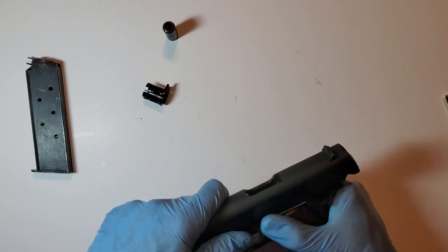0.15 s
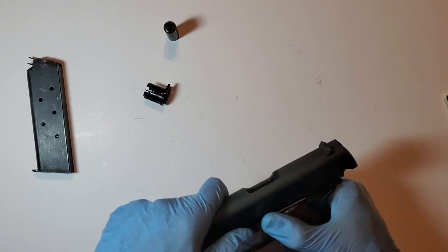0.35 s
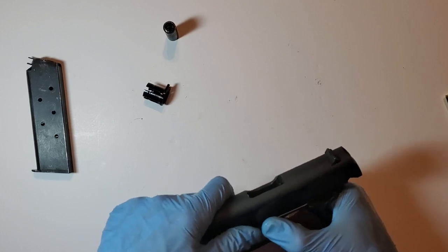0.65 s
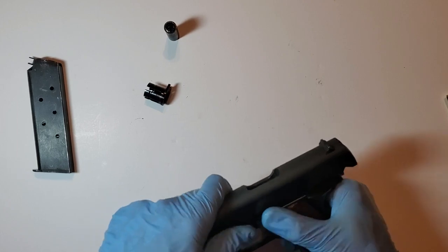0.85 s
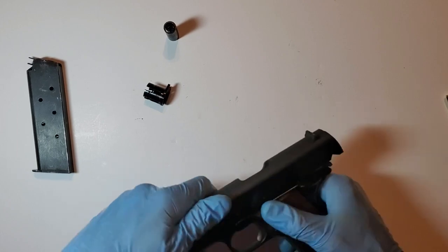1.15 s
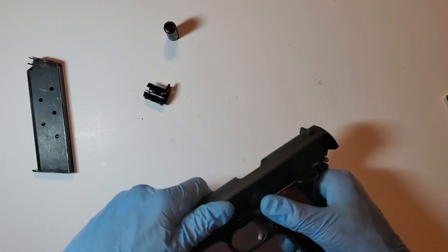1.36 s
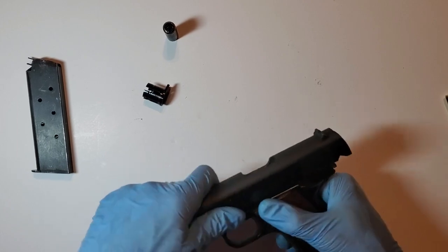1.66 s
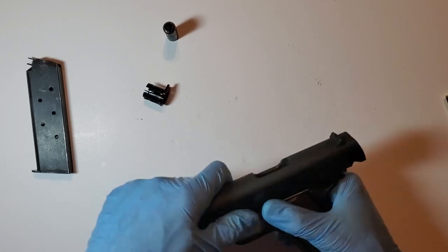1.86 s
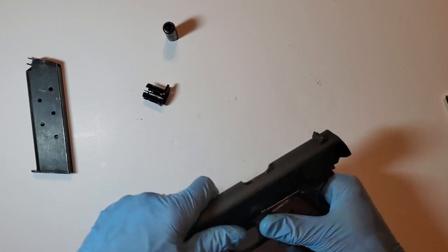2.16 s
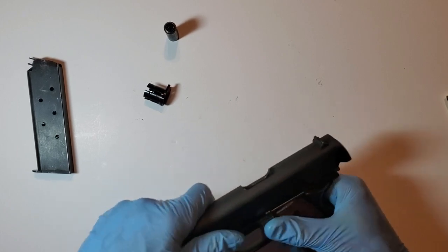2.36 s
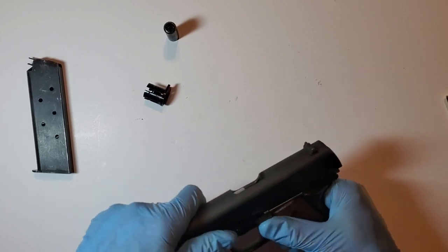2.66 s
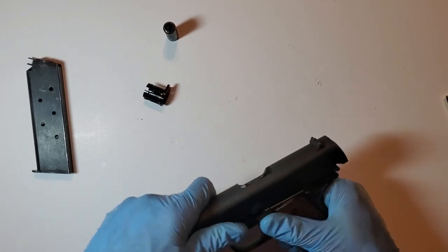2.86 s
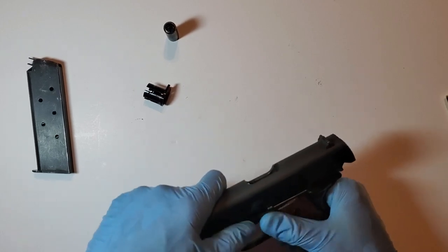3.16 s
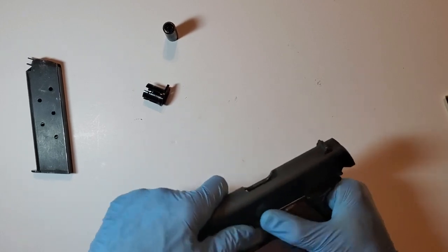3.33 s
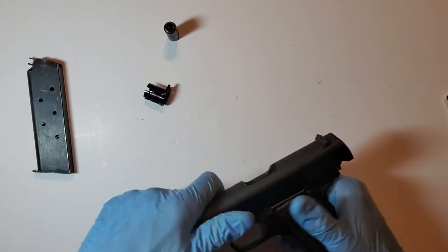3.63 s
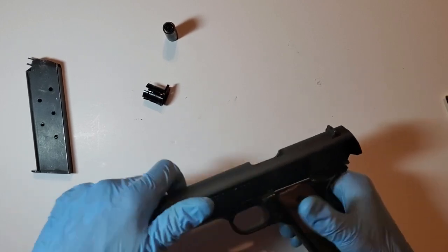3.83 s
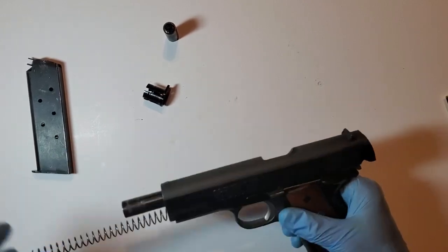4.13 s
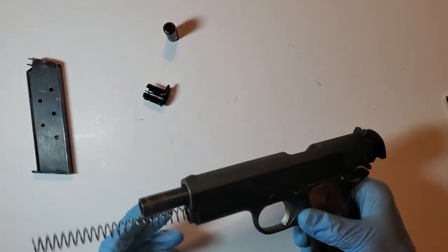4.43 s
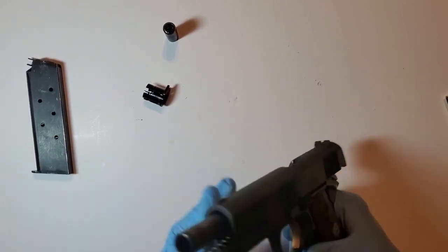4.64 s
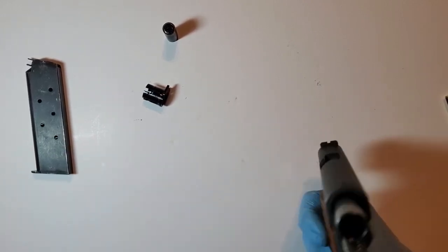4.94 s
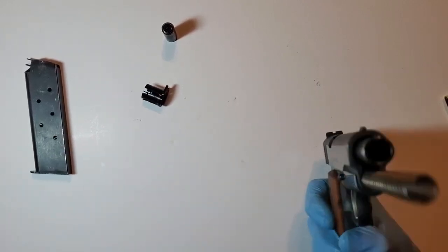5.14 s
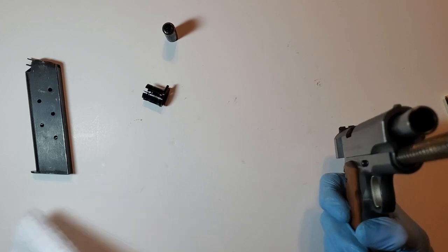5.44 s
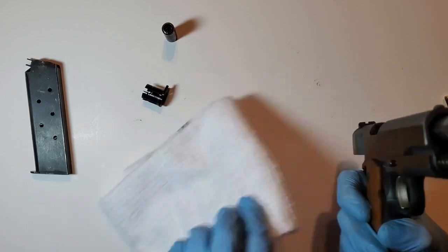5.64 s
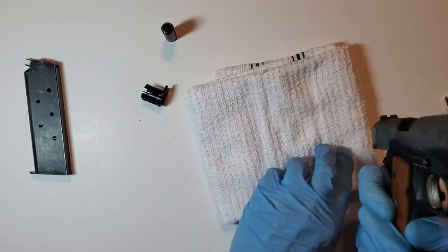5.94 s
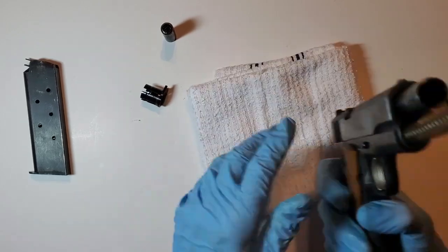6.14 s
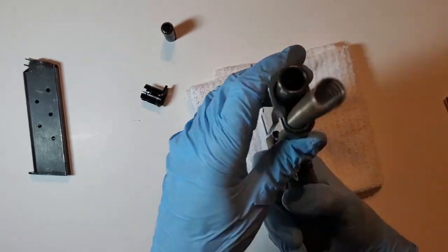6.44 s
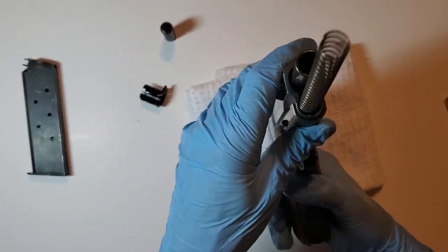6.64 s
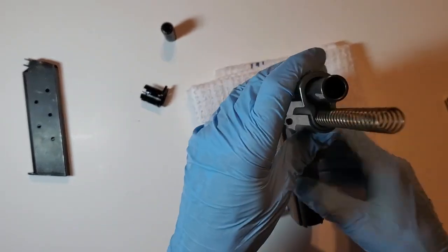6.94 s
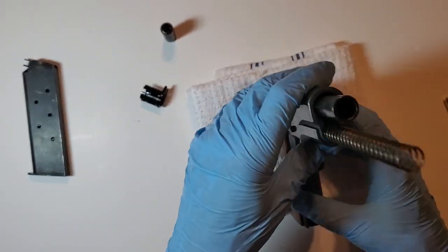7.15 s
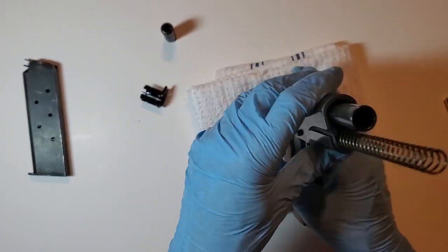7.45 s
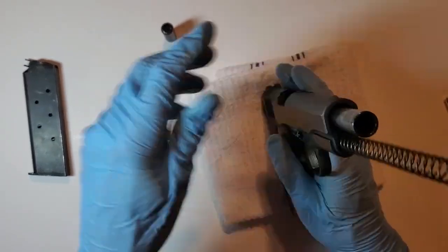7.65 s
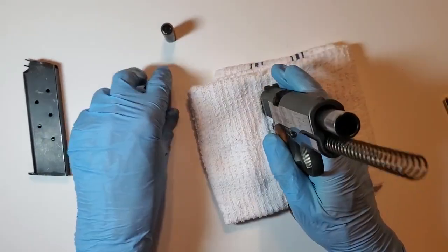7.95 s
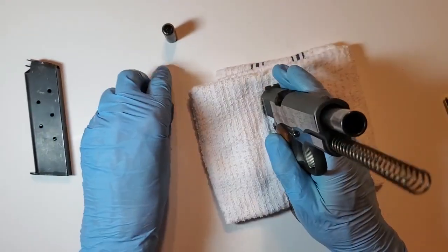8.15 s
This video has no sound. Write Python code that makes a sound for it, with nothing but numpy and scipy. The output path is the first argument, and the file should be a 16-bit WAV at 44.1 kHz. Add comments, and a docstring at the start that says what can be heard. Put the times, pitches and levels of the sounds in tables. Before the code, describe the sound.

Gloved hands take apart a steel pistol above a table, heard close with short room echoes. Small dry ticks and gritty scrapes build to a loud metallic snap with rebounds, followed by a spring's fast jittery rattle and a double knock. Then it gets quiet: towel and glove brushing, one dull pat, a few crisp clicks, tiny high clinks, over soft room noise and hum.

```python
"""In a small, lively room, gloved hands take a steel pistol apart above a table.
The slide ticks, rubs and knocks, a part snaps free and the loose recoil spring rattles along the barrel.
A towel is drawn over the table and patted, a catch clicks and a small part is picked up.
Steel contacts are short noise cracks plus ringing tones; rubbing and cloth are rough, shaped noise.
Mains hum, a low rumble and room noise lie below."""
import sys
import numpy as np
from scipy import signal
from scipy.fft import rfft, irfft
from scipy.io import wavfile

SR = 44100
rng = np.random.default_rng(int(sys.argv[2]) if len(sys.argv) > 2 else 0)


def generate_wav(signal):
    """Clip the signal to [-1, 1] and save it as 16-bit WAV at the path in sys.argv[1]."""
    frames = np.transpose(np.atleast_2d(signal))
    scaled = np.clip(frames, -1, 1) * 32767
    pcm = np.round(scaled).astype(np.int16)
    wavfile.write(sys.argv[1], SR, pcm)


N = 365588
TIME = np.arange(N) / SR

# In the event tables, levels are relative: each source also has a gain of its own.
# slide ticks against the frame: (time [s], level [dB], brightness [dB per octave], crack t60 [s])
SLIDE_TICKS = [(0.0735, -49.5, -5.5, .012), (0.0915, -50, -10, 0.019), (0.6085, -47, 1.5, 0.017),
               (0.6725, -56.5, -1.5, .03), (0.7095, -58, -4, .02), (1.0065, -46, 4, .017),
               (1.0435, -36.5, 6.5, 0.032), (1.0635, -42.5, -2, .04), (1.0955, -39.5, -4, 0.041),
               (1.1265, -31.5, 2.5, .024), (1.3745, -51, 0.5, 0.015), (1.6885, -30, -0.5, 0.02),
               (1.6995, -35, 0, 0.037), (1.7085, -35, 0, 0.031), (1.8045, -38.5, -3.5, 0.012),
               (1.8215, -35.5, -2, .044), (2.0105, -55, -3, 0.018), (2.0275, -46, -4, 0.014),
               (2.0795, -41.5, 2, 0.053), (2.1155, -46.5, .5, .023), (2.1775, -49, -3, .035),
               (2.1885, -50, -4, 0.038), (2.2355, -39, 3, 0.047), (2.5315, -43, -3, 0.012),
               (2.7535, -42, 2, 0.036), (2.7765, -31, 2.5, .032), (2.7905, -24.5, 4.5, 0.011),
               (2.8395, -30, 3, 0.048), (2.8475, -33.5, 1.5, .03), (2.8735, -39, -6, .025),
               (3.0745, -30, 4.5, 0.047), (3.6743, -49, 1.5, 0.13), (3.7205, -47.5, -2.5, 0.039),
               (3.8525, -30.5, 0.9, 0.03), (3.9615, -49, -3.5, .044), (4.2465, -42, 2.5, 0.044),
               (4.2505, -41.5, 9, .02), (4.3235, -30, 2, .02)]
# the whole slide knocks against its stop: (time [s], level [dB], brightness [dB per octave], crack t60 [s])
STOP_KNOCKS = [(3.0805, -26, -1, .012), (4.7325, -25, 0, 0.019), (4.739, -26.5, 1.5, 0.014)]
# light taps of the loose barrel: (time [s], level [dB], brightness [dB per octave])
BARREL_TAPS = [(0.4555, -39.5, 2), (0.4665, -47, -4), (0.9125, -54.5, -5.5), (0.9695, -43.5, -3),
               (3.292, -42, 4), (4.0155, -40.5, -3), (4.0275, -51, -17), (4.8265, -47.5, -5),
               (4.9195, -45.5, 3), (5.0815, -52.5, 1), (6.3455, -54.5, -3), (6.4725, -54, -3)]
# a part snaps free under spring load and rebounds:
# (time [s], level [dB], brightness [dB per octave], crack t60 [s])
SNAP_HITS = [(3.3595, -16.5, 0, 0.018), (3.3695, -25.5, 2.5, .044), (3.3825, -20, 0.5, 0.039),
             (3.3865, -25, -1.5, .044)]
# spring coils rattle against their guide, later sway: (time [s], level [dB], brightness [dB per octave])
SPRING_TICKS = [(4.3935, -31.5, -2), (4.4015, -35, 7), (4.4115, -38, -2), (4.4345, -32, -3),
                (4.4515, -33.5, 6), (4.4685, -35.5, -1), (4.5315, -37, 2), (4.5415, -27, 1.5),
                (4.5505, -27, 0.5), (4.6015, -36, 1), (4.6175, -29.5, -1.5), (4.6825, -41.5, -3.5),
                (4.8395, -41.5, -1), (6.3375, -48.5, 0), (6.4085, -54, 2), (6.4265, -50, 1),
                (6.9695, -53, 3), (7.0635, -56, -0.5), (7.2155, -63.5, -1), (7.2975, -63, -1),
                (7.8875, -54, 1), (7.9765, -59, -4), (8.1355, -57.5, -5)]
# the catch on the gripped frame: (time [s], level [dB], brightness [dB per octave], crack t60 [s])
CATCH_CLICKS = [(6.2315, -36, 1.5, 0.053), (6.5513, -46, -4.5, 0.019), (6.6235, -51.5, 0, 0.051),
                (6.8365, -30, 0, 0.013)]
# a small loose part is picked up: (time [s], level [dB], brightness [dB per octave])
CLINKS = [(7.6295, -53, -5), (7.6515, -51, 3), (7.6985, -47, 0), (7.7405, -39, 0.5), (7.8365, -48.5, 0)]

# edges of the four bands that share a contact's energy: (edge [Hz])
CONTACT_BANDS = [800, 2400, 4500, 9000, 17000]
# how each part divides a contact among those bands, low to high: (share [dB])
SLIDE_SHARES = [-13, -4, -4.5, -10.5]
STOP_SHARES = [-11, -4.5, -4.5, -7.5]
BARREL_SHARES = [-10.5, -2.5, -7.5, -15]
SNAP_SHARES = [-16.5, -3, -8, -7]
SPRING_SHARES = [-15.5, -10, -2, -5.5]
CATCH_SHARES = [-11, -3, -4, -11.5]
CLINK_SHARES = [-12.5, -3.5, -3, -12]

# broad, hand-damped resonances of each part: (frequency [Hz], width [Hz], boost [dB])
SLIDE_BODY = [(1104, 580, 7), (2110, 450, 5), (3520, 500, 6.5), (4860, 83, 2), (6610, 820, 14),
              (7230, 160, 12.5), (8140, 180, 9.5), (10500, 700, 6), (10800, 290, 10), (14900, 1200, 2)]
STOP_BODY = [(1366, 300, 12), (1970, 330, 16), (2670, 360, 5.2), (3470, 350, 5.2), (7350, 1800, 14),
             (14950, 900, 4)]
BARREL_BODY = [(3180, 200, 9), (3380, 190, 18.5), (7360, 200, 7.4), (8000, 120, 9.3), (8350, 230, 8.3),
               (11230, 300, 4.4), (15000, 900, 4)]
SNAP_BODY = [(1895, 430, 6.5), (2353, 200, 3.3), (3140, 300, 4), (3480, 230, 15), (4000, 240, 4.1),
             (5150, 370, 4.7), (6360, 870, 4.9), (11650, 1200, 8.7), (15250, 570, 8.4)]
SPRING_BODY = [(2240, 580, 6.1), (3500, 300, 12), (4340, 230, 5.5), (6640, 1000, 7.7), (7950, 91, 19.8),
               (8400, 240, 8.3), (10400, 530, 9), (11410, 130, 20), (11900, 190, 4.1)]
CATCH_BODY = [(1240, 220, 8.2), (2290, 360, 7.7), (3850, 66, 10), (5730, 470, 10), (7140, 690, 11),
              (12700, 1600, 6)]
CLINK_BODY = [(2110, 250, 9.8), (3400, 340, 8.4), (4780, 200, 11.3), (7400, 430, 5.9), (8200, 160, 5.8),
              (10850, 150, 9.2), (11760, 130, 16)]

# the tones of each part that ring on: (frequency [Hz], relative level [dB], t60 [s])
SLIDE_MODES = [(2675, -14.5, 0.048), (4000, -26.5, .12), (7000, -18, .14), (11340, -31, .16)]
STOP_MODES = [(1437, -6, .13), (2000, -8, 0.093), (2520, -22, 0.1), (3500, -14, .22), (3750, -21.5, .22)]
BARREL_MODES = [(3630, -11, .1), (3410, -10, 0.15), (3560, -14, .13), (8000, -19, .12), (8550, -19.5, .1)]
SNAP_MODES = [(2945, -22.5, .27), (3123, -22, .3), (3220, -13.5, 0.19), (3420, -12.5, 0.32),
              (3510, -5, .25), (3380, -14, 0.18), (3520, -11, 0.16), (3730, -20, 0.33), (3894, -21.5, 0.23),
              (4600, -20.5, .17), (4393, -19, .17), (5250, -18, 0.17), (11400, -26, .16),
              (13070, -19.5, .15)]
SPRING_MODES = [(2280, -11, .2), (3461, -29, 0.18), (4600, -30, 0.25), (7600, -13.5, 0.37),
                (8500, -31, 0.18), (11333, -15, 0.33), (11200, -19, .18), (12030, -30, .25)]
CATCH_MODES = [(1236, 0.5, 0.1), (2395, -15, .09), (3840, -14, 0.083), (5880, -21, 0.058)]
CLINK_MODES = [(4900, -20, 0.13), (7540, -19, .12), (8450, -23, 0.15), (11600, -3, 0.19)]

# steel slides on steel: (start [s], length [s], level [dB], treble tilt [dB per octave])
STROKES = [(0.432, 0.18, -58.5, 0), (0.98, 0.13, -51, 0), (1.646, 0.096, -40, -3.5), (1.754, .1, -54, -7),
           (1.991, 0.17, -54.5, -6), (2.478, 0.12, -43.5, -7), (2.743, 0.13, -41, -0.5),
           (3.054, .05, -50, -4.5), (3.355, 0.12, -39, 4), (3.719, 0.25, -52.5, 0), (3.934, 0.29, -57, -1),
           (4.306, 0.056, -46, 6), (4.373, 0.12, -48.5, -1), (4.52, .15, -48, 2),
           (4.655, 0.18, -43.5, -2.5), (6.401, 0.12, -60, -7)]
# spectrum of steel sliding: (frequency [Hz], density [dB per Hz])
STROKE_COLOUR = [(400, -21.5), (1000, -7.5), (2000, -6), (3500, 4.5), (5000, -3), (7000, 0), (9500, -5),
                 (11500, -3), (13000, -8), (16000, -13.5)]
# gloves and towel brush past: (start [s], length [s], soft rub level [dB], fine hiss level [dB])
BRUSHES = [(0.203, 0.25, -66, -74), (5.02, 0.29, -63, -66.5), (5.283, 0.37, -65.5, -62.5),
           (5.55, 0.38, -69, -69), (5.735, 0.23, -72, -63.5), (5.82, 0.49, -63, -68),
           (6.206, 0.18, -58, -58.5), (6.365, 0.3, -63.5, -66), (6.58, 0.6, -71, -71),
           (6.916, .19, -65, -64), (7.272, .15, -71, -79), (7.469, 0.52, -66, -68), (7.848, 0.31, -70, -76)]
# spectrum of the soft cloth rub: (frequency [Hz], density [dB per Hz])
RUB_COLOUR = [(600, -6), (1500, -15), (2800, -0.5), (4000, -1.5), (6800, 1), (8500, -3), (11000, -17)]
# spectrum of the fine cloth hiss: (frequency [Hz], density [dB per Hz])
HISS_COLOUR = [(6500, -30), (9500, -3), (13000, 3), (16000, 0.5)]

# how long echoes last: (frequency [Hz], t60 [s])
ROOM_T60 = [(1000, 0.42), (3500, 0.41), (8000, 0.34), (15000, 0.27)]
# how strongly each pitch feeds the echoes: (frequency [Hz], gain [dB])
ROOM_SEND = [(500, 0.5), (2000, -1), (7000, -1.5), (16000, -1.5)]
# how alike left and right are: (frequency [Hz], correlation [-1 to 1])
AIR_LIKENESS = [(60, 0.89), (150, 0.94), (300, 0.69), (600, 0.43), (1200, 0), (4000, 0.1), (16000, 0)]
# spectrum of the room noise: (frequency [Hz], density [dB per Hz])
ROOM_NOISE = [(60, -32), (100, -8.5), (147, -4), (190, -9.5), (240, -8), (322, -16.5), (415, -14),
              (560, -19), (1000, -15), (1750, -20.5), (4200, -39), (7800, -43), (16000, -52.5)]
# level of the room noise over time: (time [s], level [dB])
ROOM_LEVEL = [(0, -53), (3.3, -55), (3.42, -57.5), (4.5, -56), (8.29, -57)]
# spectrum of the low rumble: (frequency [Hz], density [dB per Hz])
RUMBLE = [(20, -21.5), (32, -14), (48, 1), (70, 4.5), (90, -1), (130, -15.5), (220, -46.5)]
# rumble over time, before its gain: (time [s], level [dB])
RUMBLE_LEVEL = [(0.0, -49), (0.28, -55), (2.84, -52), (3.07, -59), (3.16, -48.5), (4.15, -65), (4.73, -52),
                (5.24, -61.5), (6.56, -59), (7.09, -67.5), (7.18, -56.5), (8.29, -55)]
# mains hum: (frequency [Hz], level [dB rms])
HUM = [(60, -61.5), (120, -76.5), (240, -64.5)]


def slide_ticks():
    """The slide ticks on the frame: cracks with a few short ringing tones."""
    return contacts(SLIDE_TICKS, SLIDE_SHARES, SLIDE_BODY, SLIDE_MODES,
                    level_db=0.15, ring_db=0.5, rise_s=0.00046, alike=0.1, thud_db=-12.5)


def stop_knocks():
    """The whole slide hits its stop and drives the stop's own resonances."""
    return contacts(STOP_KNOCKS, STOP_SHARES, STOP_BODY, STOP_MODES,
                    level_db=-0.5, ring_db=-1.0, rise_s=0.00045, alike=0.11, thud_db=-15)


def sliding():
    """Steel rubs on steel: each stroke is gritty noise that swells and fades with the pressure."""
    out = np.zeros((2, N))
    gain_db = -1.5
    for start, length_s, level_db, tilt_db in STROKES:
        pressure = swell(start, length_s, rise_share=0.41)[round(start * SR):][:SR // 3]
        grit = coloured(grainy(len(pressure), per_s=600, rough_db=4.0), STROKE_COLOUR, tilt_db)
        add(out, start, in_room(from_db(level_db + gain_db) * pressure * grit))
    return out


def barrel_taps():
    """The loose barrel is tapped lightly: a crack and a cluster of ringing tones."""
    return contacts(lasting(BARREL_TAPS, t60=0.039), BARREL_SHARES, BARREL_BODY, BARREL_MODES,
                    level_db=1.2, ring_db=3.5, rise_s=0.00032, alike=0.1, thud_db=-11.5)


def snap():
    """Spring load throws a part free; it rebounds and rings, a little louder on the left."""
    hits = contacts(SNAP_HITS, SNAP_SHARES, SNAP_BODY, SNAP_MODES,
                    level_db=0.5, ring_db=-6.0, rise_s=0.0005, alike=-0.05, thud_db=-15.5)
    return hits * from_db([[0.9], [-0.9]])


def spring_rattle():
    """Spring coils strike their guide: sharp cracks with a faint metallic ring."""
    return contacts(lasting(SPRING_TICKS, t60=0.039), SPRING_SHARES, SPRING_BODY, SPRING_MODES,
                    level_db=-0.5, ring_db=-13.5, rise_s=0.00025, alike=0.044, thud_db=-17)


def catch_clicks():
    """The catch clicks on the gripped frame, whose tones die quickly."""
    return contacts(CATCH_CLICKS, CATCH_SHARES, CATCH_BODY, CATCH_MODES,
                    level_db=0.5, ring_db=-6.0, rise_s=0.00024, alike=0.043, thud_db=-20)


def clinks():
    """A small loose part clinks as it is picked up, with a high ring."""
    return contacts(lasting(CLINKS, t60=0.045), CLINK_SHARES, CLINK_BODY, CLINK_MODES,
                    level_db=0.0, ring_db=1.0, rise_s=0.00018, alike=0.046, thud_db=-5)


def rustle():
    """Cloth on the table and gloves on steel: each brush is a soft rub with a fine hiss above it."""
    rub_gain_db, hiss_gain_db = 2.5, 5.0
    rub, hiss = 0, 0
    for start, length_s, rub_db, hiss_db in BRUSHES:
        speed = swell(start, length_s, rise_share=0.32)
        rub = rub + from_db(rub_db + rub_gain_db) * speed
        hiss = hiss + from_db(hiss_db + hiss_gain_db) * speed
    soft = coloured(grainy(N, per_s=220, rough_db=1.5), RUB_COLOUR)
    fine = coloured(grainy(N, per_s=400, rough_db=2.5), HISS_COLOUR)
    return rub * soft + hiss * fine


def palm_pat():
    """A palm pats the towel flat: a dull puff of fading, band-limited noise."""
    start, level_db, t60 = 6.035, -50.5, 0.32   # s, dB, s
    t = np.arange(SR // 4) / SR
    noise = stereo(rng.standard_normal((2, len(t))), 0.5)
    dull_band = signal.butter(2, [200, 900], "band", fs=SR, output="sos")   # Hz
    puff = rms_one(signal.sosfilt(dull_band, noise))
    out = np.zeros((2, N))
    add(out, start, from_db(level_db - 60 * t / t60) * puff)
    return out


def background():
    """Room noise, a slowly changing rumble and steady mains tones."""
    noise_db = np.interp(TIME, *np.transpose(ROOM_LEVEL))
    noise = from_db(noise_db) * coloured(rng.standard_normal((2, N)), ROOM_NOISE)
    rumble_db = np.interp(TIME, *np.transpose(RUMBLE_LEVEL)) - 1.0
    rumble = from_db(rumble_db) * coloured(rng.standard_normal((2, N)), RUMBLE)
    hum = 0
    for hz, level_db in HUM:
        peak = np.sqrt(2) * from_db(level_db)   # a sine peaks at root 2 times its rms
        hum = hum + peak * np.sin(2 * np.pi * (hz * TIME + rng.random()))
    return noise + rumble + hum


def contacts(rows, shares_db, body, modes, level_db, ring_db, rise_s, alike, thud_db):
    """Each contact is a crack of dense, hand-damped modes, followed by the few modes that ring on."""
    out = np.zeros((2, N))
    ring_t = np.arange(SR // 3) / SR
    crack_t = ring_t[:SR // 16]
    start_window = crack_t < 0.006   # s, the stretch that sets the crack's level
    bands = list(zip([450, *CONTACT_BANDS], CONTACT_BANDS))
    filters = [signal.butter(3, edges, "band", fs=SR, output="sos") for edges in bands]
    for start, hit_db, brightness_db, crack_t60 in rows:
        shares = tilted(shares_db, brightness_db)
        grit = resonate(stereo(rng.standard_normal((2, len(crack_t))), alike), body)
        # the mass of the part adds a weak thud under the crack
        thud_and_shares = [shares[0] * from_db(thud_db), *shares]
        crack = 0
        for share, sos, (low, _) in zip(thud_and_shares, filters, bands):
            # the higher the band, the sooner it dies; the table's t60 holds for the second share
            t60 = crack_t60 * (CONTACT_BANDS[1] / low) ** 0.21
            shape = (1 - np.exp(-crack_t / rise_s)) * from_db(-60 * crack_t / t60)
            energy = np.mean(shape ** 2) / np.mean(shape[start_window] ** 2)
            crack = crack + share * np.sqrt(energy) * rms_one(signal.sosfilt(sos, grit * shape))
        add(out, start, from_db(hit_db + level_db) * in_room(crack))
        for hz, mode_db, t60 in modes:
            # the contact's colour decides how well it drives each mode
            share = shares[np.searchsorted(CONTACT_BANDS[1:-1], hz)]
            drive = share * from_db(hit_db + ring_db + mode_db + rng.normal(0, 1.3))
            # a mode reaches left and right nearly in step
            phase = rng.uniform(0, 2 * np.pi) + rng.normal(0, 0.34, (2, 1))
            tone = np.sin(2 * np.pi * hz * ring_t + phase)
            add(out, start, drive * from_db(-60 * ring_t / t60) * tone)
    return out


def lasting(rows, t60):
    """Contacts that are all given the same crack time."""
    return [(*row, t60) for row in rows]


def tilted(shares_db, brightness_db):
    """A harder contact shifts its energy towards the upper bands; the total stays the same."""
    # the middle of each band, in octaves
    octaves = np.log2(np.multiply(CONTACT_BANDS[:-1], CONTACT_BANDS[1:])) / 2
    shares = from_db(np.array(shares_db) + brightness_db * (octaves - octaves.mean()))
    return shares / np.linalg.norm(shares)


def resonate(x, body):
    """Each resonance lifts its own stretch of the spectrum."""
    out = x
    for hz, width_hz, boost_db in body:
        r = np.exp(-np.pi * width_hz / SR)   # a wider resonance forgets faster
        feedback = [1, -2 * r * np.cos(2 * np.pi * hz / SR), r * r]
        peak = signal.lfilter([1, 0, -1], feedback, x) * (1 - r * r) / 2
        out = out + (from_db(boost_db) - 1) * peak
    return out


def grainy(size, per_s, rough_db):
    """Friction: noise whose strength rises and falls as tiny bumps catch and let go."""
    bumps = np.clip(rng.standard_normal(size), -2, 2)
    grip = np.interp(np.arange(size) * per_s / SR, np.arange(size), bumps)
    return rng.standard_normal((2, size)) * from_db(rough_db * grip)


def swell(start, length_s, rise_share):
    """One movement of the hand: its strength climbs from rest to 1 and falls back."""
    return np.interp(TIME, start + length_s * np.array([0, rise_share, 1]), [0, 1, 0])


def in_room(x):
    """Quick reflections from table and hands, then a diffuse tail; each sound gets a new echo pattern."""
    early_db, early_t60, tail_db, gap_s = -30.0, 0.13, -34.5, 0.003   # dB, s, dB, s
    size = 32768
    t, hz = np.arange(size * 2 // 3) / SR, np.fft.rfftfreq(size, 1 / SR)
    echoes = rng.standard_normal((2, len(t))) * (t > gap_s)
    early = from_db(early_db - 60 * t / early_t60)
    response = 0
    for k, (_, t60) in enumerate(ROOM_T60):
        # each pitch region fades at its own pace and blends into its neighbours
        region = at_hz([(f, j == k) for j, (f, _) in enumerate(ROOM_T60)], hz)
        fade = np.hypot(early, from_db(tail_db - 60 * t / t60))
        response = response + region * rfft(echoes * fade, size)
    response = stereo(response, at_hz(AIR_LIKENESS, hz)) * from_db(at_hz(ROOM_SEND, hz))
    return irfft(rfft(x, size) * (1 + response), size)


def coloured(x, spectrum, tilt_db=0):
    """Give a pair of noises a spectrum, a tilt above 2 kHz and the width of the room; rms 1."""
    hz = np.fft.rfftfreq(x.shape[1], 1 / SR)
    gain = from_db(at_hz(spectrum, hz) + tilt_db * np.log2(np.maximum(hz, 2000)))
    return rms_one(irfft(stereo(rfft(x), at_hz(AIR_LIKENESS, hz)) * gain, x.shape[1]))


def stereo(pair, alike):
    """Two unrelated signals become left and right with the given correlation."""
    alike = np.clip(alike, -0.99, 0.99)
    mid = np.sqrt(1 + alike) * pair[0]
    side = np.sqrt(1 - alike) * pair[1]
    return np.array([mid + side, mid - side]) / np.sqrt(2)


def at_hz(points, hz):
    """Read a table on a log-frequency axis, the way we hear pitch."""
    f, value = np.transpose(points)
    return np.interp(np.log(np.maximum(hz, 1)), np.log(f), value)


def from_db(db):
    """Decibels to gain."""
    return 10 ** (np.asarray(db) / 20)


def rms_one(x):
    """Scale to rms 1."""
    return x / np.sqrt(np.mean(x ** 2) + 1e-20)


def add(out, start, sound):
    """Mix a sound in at a time in seconds."""
    at = round(start * SR)
    out[:, at:at + sound.shape[1]] += sound[:, :N - at]


def scene():
    """All the steel sounds in the room, over cloth and background."""
    slide = slide_ticks() + stop_knocks() + sliding()
    loose_parts = barrel_taps() + snap() + spring_rattle() + catch_clicks() + clinks()
    cloth = rustle() + palm_pat()
    return slide + loose_parts + cloth + background()


def record(dry):
    """A steep low-pass removes the top of the treble."""
    cutoff_hz = 15850
    low_pass = signal.ellip(12, 0.1, 70, cutoff_hz, fs=SR, output="sos")   # order, ripple dB, stop dB
    return signal.sosfilt(low_pass, dry)


dry = scene()
out = record(dry)
generate_wav(out)
```